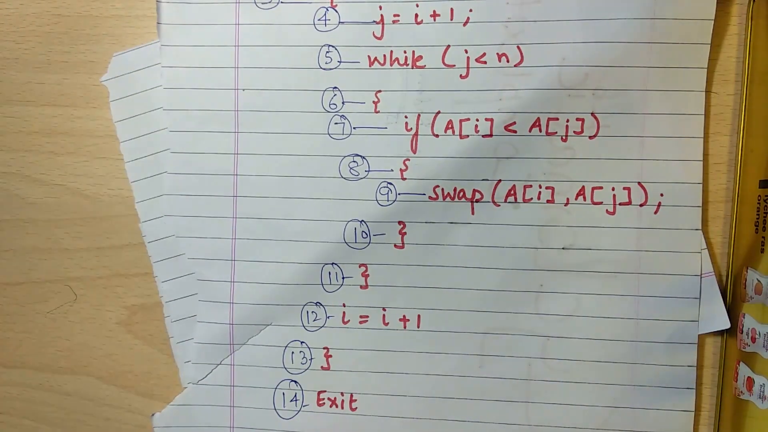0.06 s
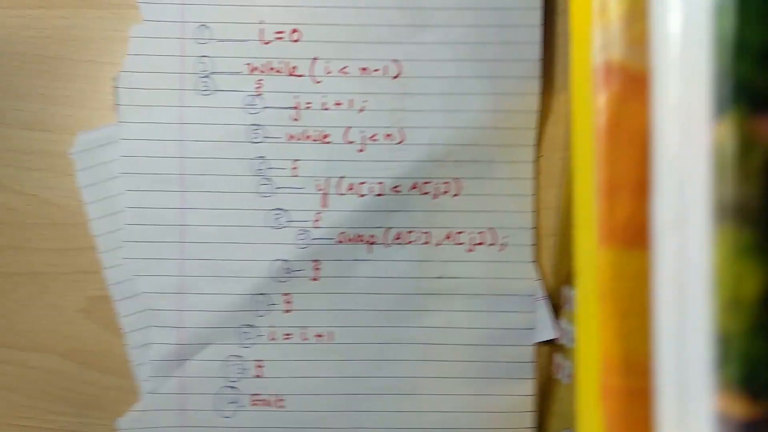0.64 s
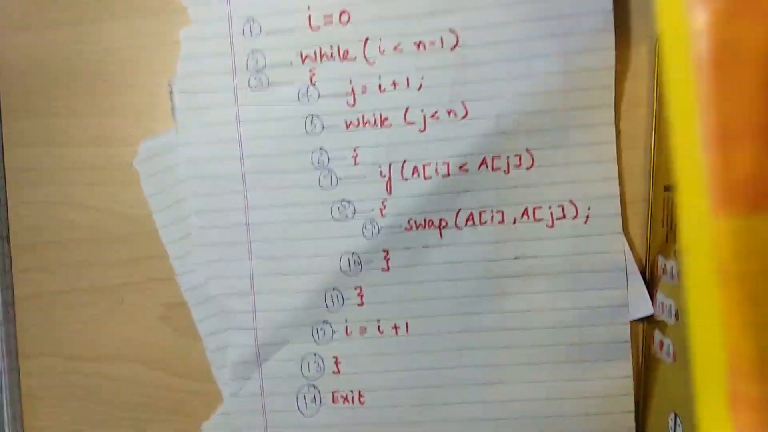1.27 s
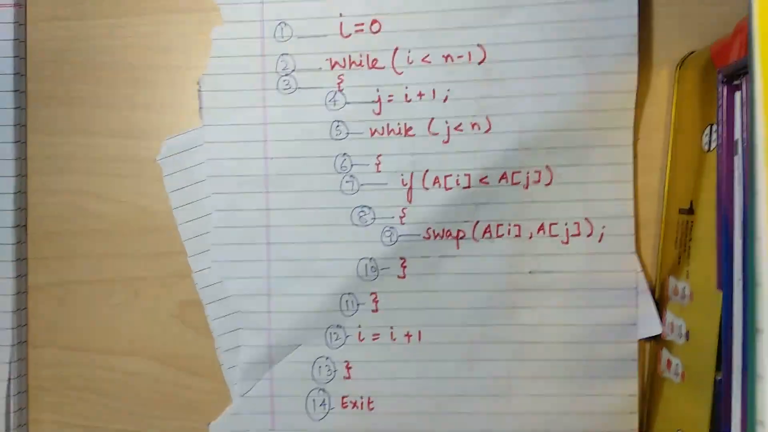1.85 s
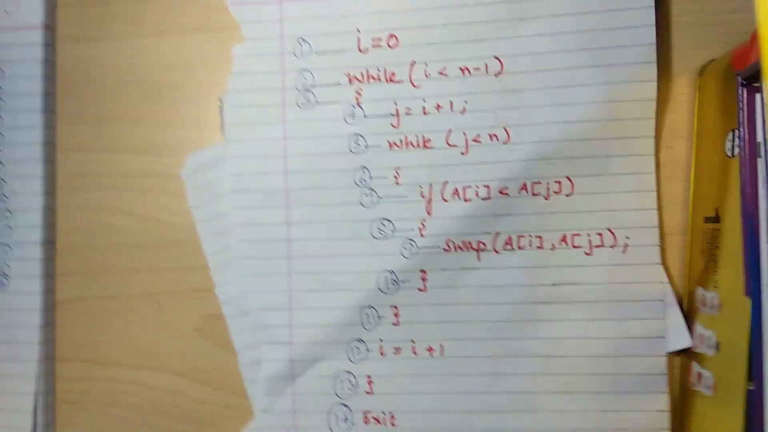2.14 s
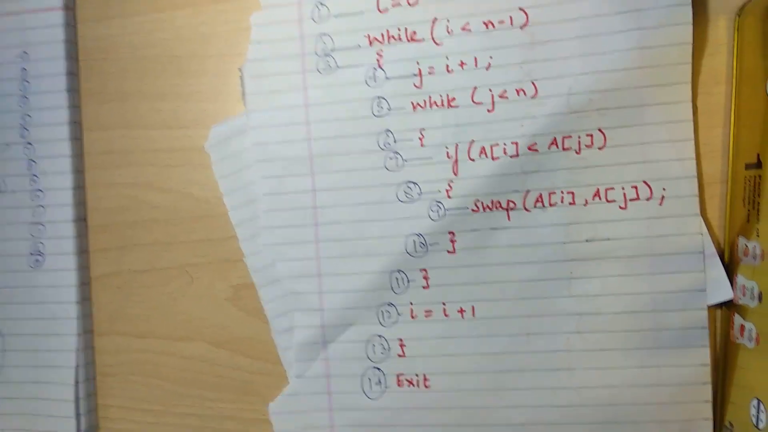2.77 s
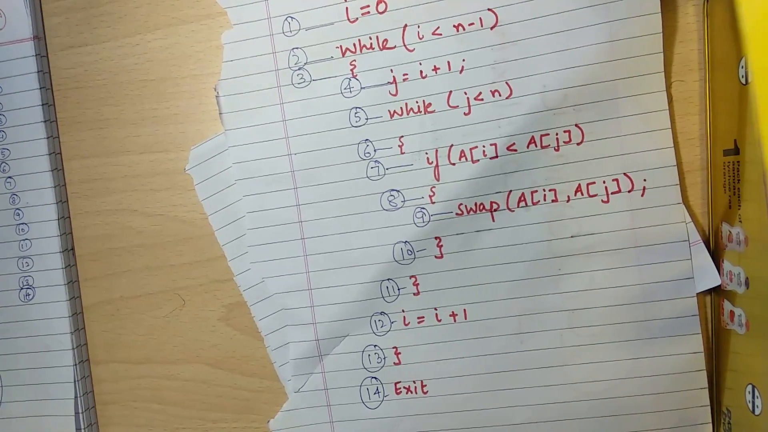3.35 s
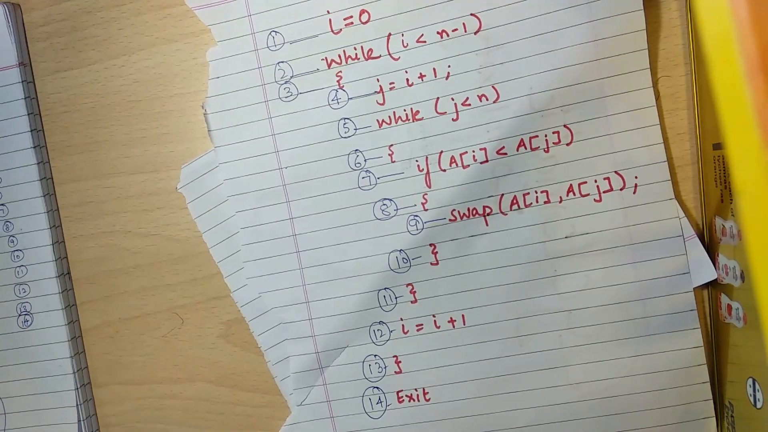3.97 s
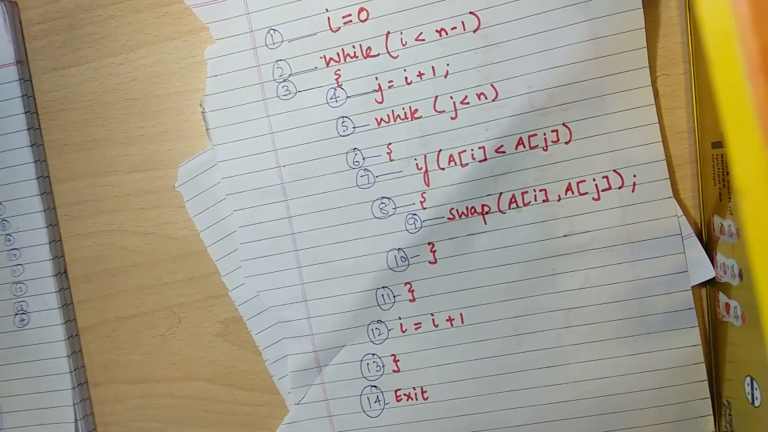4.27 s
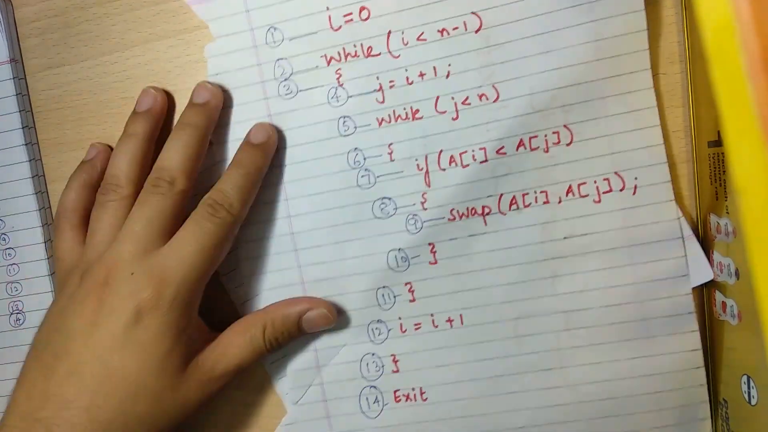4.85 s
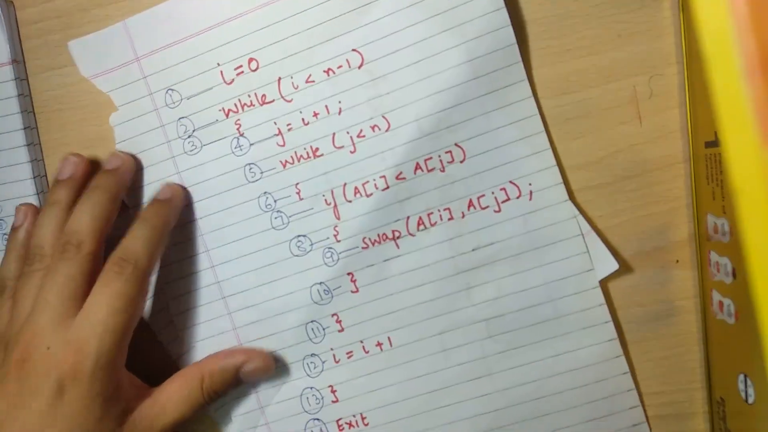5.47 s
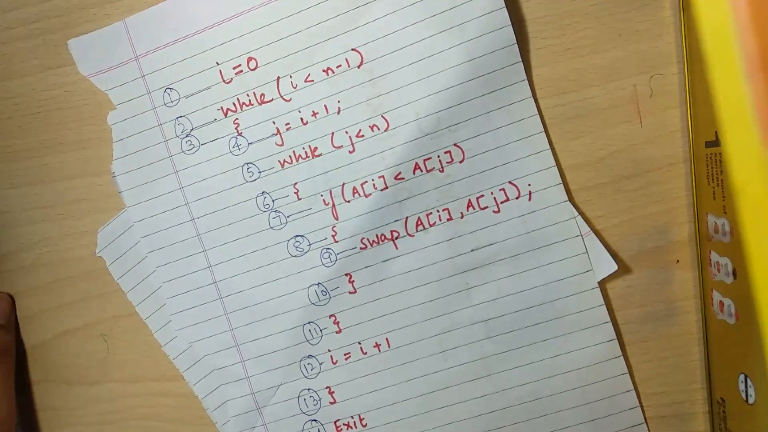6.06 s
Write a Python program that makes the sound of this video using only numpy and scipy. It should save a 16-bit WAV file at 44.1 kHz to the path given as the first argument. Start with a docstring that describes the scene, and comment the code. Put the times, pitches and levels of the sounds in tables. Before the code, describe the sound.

In a quiet room with a faint hum, paper is pushed about on a desk in uneven, crackly swishes. Close handling noise takes over on the right side: dull bumps, rubbing and a stuttering rumble of fingers on the microphone. The sheets then slide again with a few ticks, hissing most strongly shortly before one final rustle.

```python
"""Sheets of lined paper slide about a wooden desk under a hand-held phone.
Room hum and microphone hiss run from the start; the level drops out now and then. From 0.3 s the stack
drags, desk and case knock, and sheets hiss and rasp amid snaps and clicks. From 1.4 s fingers shift on
the case at the right microphone port: it rumbles, scrapes and thumps, then judders (2.6-3.6 s) as a
faint whine swells. From 4.2 s the sheets slide again, hissing most near 5.1 s."""
import sys
import numpy as np
from scipy import signal
from scipy.fft import rfft, irfft, next_fast_len
from scipy.io import wavfile
from scipy.ndimage import uniform_filter1d, map_coordinates

SR = 44100
rng = np.random.default_rng(int(sys.argv[2]) if len(sys.argv) > 2 else 0)


def put_to_file(sound):
    """Save the sound as 16-bit audio at rate SR, in the file named by the first command-line argument."""
    columns = np.atleast_2d(sound).T  # one column per channel
    safe = np.clip(columns, -1, 1)
    whole_steps = np.round(safe * 32767)
    wavfile.write(sys.argv[1], SR, whole_steps.astype(np.int16))


N = 274035


def amp(db):
    """Decibels to gain."""
    return 10 ** (np.asarray(db) / 20)


def unit(x):
    """Scale to rms 1."""
    return x / np.sqrt(np.mean(x ** 2) + 1e-20)


def wobble(rate_hz):
    """Smooth random curve, rate_hz knots a second."""
    knots = rng.standard_normal(int(N * rate_hz / SR) + 4)
    return map_coordinates(knots, [np.arange(N) * rate_hz / SR])


def filtered(x, response):
    """Apply a frequency response."""
    size = x.shape[-1]
    padded = next_fast_len(size + 8192)
    return irfft(rfft(x, padded) * response(np.fft.rfftfreq(padded, 1 / SR)), padded)[..., :size]


def coloured(x, spectrum):
    """Shape x by (Hz, dB) points; rms 1."""
    points_hz, db = np.transpose(spectrum)
    return unit(filtered(x, lambda hz: amp(np.interp(np.log(hz + 1), np.log(points_hz), db))))


def panned(pan_db):
    """Stereo gains of mean power 1; pan is left minus right."""
    gains = np.array([amp(pan_db / 2), amp(-pan_db / 2)]).reshape(2, -1)
    return gains / np.sqrt(np.mean(gains ** 2, axis=0))


def add(track, start_s, sound):
    """Mix a stereo sound into the track."""
    part = track[:, round(start_s * SR):][:, :sound.shape[1]]
    part += sound[:, :part.shape[1]]


def swells(rows, drop_db=26, rounding=0.31):
    """One round-topped envelope per row, drop_db down at the ends of its rise and fall."""
    peak_s, rise_s, fall_s = np.transpose(rows)[:3, :, None]
    t = np.arange(N) / SR - peak_s
    away = np.minimum(np.abs(t / np.where(t < 0, rise_s, fall_s)), 10)
    return amp(-drop_db * (np.hypot(away, rounding) - rounding) / (np.hypot(1, rounding) - rounding))


def power_sum(envelopes, gains):
    """Overlapping movements add in power."""
    return np.sqrt(gains ** 2 @ envelopes ** 2)


def friction(rate_hz, spread_db, smooth):
    """Tiny uneven slips over the smooth noise of countless finer ones."""
    slips = (rng.random(N) < rate_hz / SR) * rng.standard_normal(N)
    slips *= amp(spread_db * rng.standard_normal(N))
    return unit(slips) + smooth * rng.standard_normal(N)


def desk_bounce(x, echo=0.16):
    """Add the reflection off the desk; its lag drifts as the sheet moves."""
    n = np.arange(N)
    lag_s = 0.0004 * np.exp(0.12 * wobble(4))
    return unit(x + echo * np.interp(n - SR * lag_s, n, x))


# Room noise: (frequency [Hz], level [dB])
ROOM_SPECTRUM = [(25, 3.5), (55, -6), (85, 8.5), (140, 2.5), (220, -2.5), (310, 3), (450, -7.5),
                 (950, -9.5), (1170, -5.5), (1700, -12), (3400, -18), (8000, -29.5), (12000, -30),
                 (16000, -43)]


def room(level_db=-56.5, crossover_hz=300):
    """Steady hum and hiss, alike at both ports in the bass."""
    shared = coloured(rng.standard_normal(N), ROOM_SPECTRUM)
    apart = coloured(rng.standard_normal((2, N)), ROOM_SPECTRUM)
    bass = filtered(shared, lambda hz: crossover_hz / np.hypot(hz, crossover_hz))
    treble = filtered(apart, lambda hz: hz / np.hypot(hz, crossover_hz))
    return amp(level_db) * panned(pan_db=1) * (bass + treble)


# Microphone hiss: (frequency [Hz], level [dB])
MIC_SPECTRUM = [(1500, -20), (4000, -1), (8000, 2.5), (10300, 4), (11100, 9.5), (11900, 5), (13500, 1.5),
                (14500, -0.5), (15500, -0.5)]
# Whine envelope: (peak time [s], rise [s], fall [s])
WHINE_ENVELOPE = [(3.5, 2, 1.8)]


def self_noise(hiss_db=-63.5, whine_db=-69, whine_hz=14020):
    """Steady hiss of both microphones; a wavering whine swells and fades on the right."""
    wavering_hz = whine_hz + 90 * wobble(250)
    whine = swells(WHINE_ENVELOPE)[0] * unit(np.sin(2 * np.pi * np.cumsum(wavering_hz) / SR))
    hiss = panned(pan_db=-1) * coloured(rng.standard_normal((2, N)), MIC_SPECTRUM)
    return amp(hiss_db) * hiss + amp(whine_db) * np.outer([0, 1], whine)


# Drags of the stack: (peak time [s], rise [s], fall [s], level [dB])
STACK_DRAGS = [(.41, 0.15, 0.27, -52.5), (.73, 0.45, 0.69, -46), (1.702, 1, 3.6, -59),
               (5.98, 0.53, 0.52, -58.5)]
# Paper on wood: (frequency [Hz], level [dB])
DESK_SPECTRUM = [(60, -2.5), (150, 6.5), (400, 5.5), (900, 6.5), (1300, 0.5), (1650, -1.5), (2200, -4.5),
                 (4000, -13), (9000, -48)]


def stack_drag():
    """The whole stack rubs on the wood."""
    level_db = np.transpose(STACK_DRAGS)[3]
    drag = [desk_bounce(coloured(friction(1500, 4, smooth=0.81), DESK_SPECTRUM)) for port in range(2)]
    return power_sum(swells(STACK_DRAGS), amp(level_db)) * np.array(drag)


# Blows on case and desk: (time [s], relative level [dB], pan [dB], nominal pitch [Hz], cutoff [Hz])
BLOWS = [(0.35, -24, 3, 393, 890), (0.6418, -23.5, 26, 259, 1560), (0.7054, -12.5, -20, 140, 1100),
         (0.752, -25, -11, 142, 403), (1.005, -28, -19, 101, 250), (1.379, -11.5, -19, 137, 493),
         (1.385, -8.5, -32, 372, 1950), (2.3609, -3.5, -35, 111, 525), (2.4026, -16.5, -32, 207, 1361),
         (2.4193, -12, -35, 139, 352), (2.518, -24, -28, 127, 250), (2.5503, -9.5, -36, 160.6, 970),
         (2.799, -24, -26, 260, 1700), (2.8291, -4.5, -20, 114, 650), (2.8545, -6.5, -23.5, 223, 520),
         (2.873, -11.5, -29, 250, 417), (2.8865, -26, -28, 278, 590), (2.9004, -15.5, -35, 208, 308),
         (2.937, -23.5, -37, 192, 1200), (3.6206, -12.5, -32, 230, 1490), (4.204, -29, -20, 109, 1100),
         (4.2451, -21.5, -8, 109, 1530), (4.2619, -22.5, -27, 119, 915), (4.501, -38, 1.5, 100, 155),
         (4.828, -32.5, -8, 79, 510)]


def knocks(decay_cycles=6.96, trim_db=-6.5):
    """A blunt push and a damped swing that sinks in pitch as the contact relaxes."""
    track, t = np.zeros((2, N)), np.arange(SR // 4) / SR
    for time_s, level_db, pan_db, pitch_hz, cutoff_hz in BLOWS:
        t60_s = decay_cycles / pitch_hz
        sinking_hz = pitch_hz * (0.66 + 1.02 * np.exp(-t / 0.005))
        envelope = amp(-60 * t / t60_s) * (1 - np.exp(-t / 0.00024))
        swing = envelope * np.sin(2 * np.pi * np.cumsum(sinking_hz) / SR)
        contact = 0.12 * rng.standard_normal(len(t)) * amp(-60 * t / 0.022)  # grit
        contact[0] = -1  # impact
        push = signal.sosfilt(signal.butter(3, cutoff_hz, fs=SR, output="sos"), contact)
        blow = swing / np.abs(swing).max() + 0.62 * push / np.abs(push).max()
        add(track, time_s, amp(level_db + trim_db) * panned(pan_db) * blow / np.abs(blow).max())
    return track


# Pushes of a sheet: (peak time [s], rise [s], fall [s], hiss [dB], pan [dB], left rasp [dB])
SHEET_PUSHES = [(.59, .03, 0.045, -47.5, -2, -56), (0.721, 0.16, 0.1, -42.5, 3.5, -42.5),
                (.81, 0.17, 0.093, -41.5, 3.5, -42), (.97, 0.21, 0.4, -56, 6, -58),
                (1.112, 0.11, 0.19, -45.5, -2, -49), (1.38, 0.17, 0.081, -52, -0.5, -46),
                (1.495, 0.25, 0.2, -42.5, 15, -54.5), (1.61, 0.14, 0.15, -47, -0.5, -52.5),
                (1.713, 0.085, 0.14, -45.5, 8.5, -45), (1.866, .035, 0.074, -52, 10, -44.5),
                (1.915, 0.19, 0.1, -45, 2, -49), (2.114, 0.17, 0.14, -40.5, 11, -46),
                (2.22, .2, 0.22, -46.5, 14, -56.5), (2.76, 0.94, 0.53, -63.5, -2.5, -62.5),
                (3.64, 0.019, 0.075, -59, -6.5, -54.5), (4.17, 0.017, 0.034, -48, -26, -65.5),
                (4.277, 0.1, 0.047, -57, 8, -47), (4.332, 0.052, 0.056, -50, 7, -51),
                (4.829, 0.042, 0.094, -43.5, -9, -45.5), (5.09, 0.35, 0.2, -37.5, -8.5, -55.5),
                (5.45, 0.18, 0.26, -55, -6, -60), (5.717, 0.05, 0.27, -48.5, -9.5, -52.5),
                (5.951, 0.16, 0.26, -42, -7, -43)]
# Hiss of a sheet lying left or right, one spectrum per port (L, R): (frequency [Hz], level [dB])
LEFT_SHEET_SPECTRA = [
    [(2500, -19), (4000, -7), (5500, -4), (7500, 2), (9500, 2), (12000, 0), (15500, -1.5)],
    [(2500, -36.5), (5500, -19.5), (8000, -8), (9500, 0), (11500, 3.5), (13000, -3), (15500, -8.5)],
]
RIGHT_SHEET_SPECTRA = [
    [(2500, -24.5), (4200, -8), (6500, -1.5), (8000, -0.5), (10500, 1), (13000, -7.5), (15500, -11.5)],
    [(2500, -32.5), (5200, -13), (7400, -5.5), (8700, -5), (10700, 1.5), (13000, -1.5), (15500, -6.5)],
]
# Edge rasp: (frequency [Hz], level [dB])
RASP_SPECTRUM = [(900, 3), (2000, 5.5), (3200, 5.5), (4400, 8), (6000, 2), (8000, 3), (14000, -14)]


def sliding_sheets():
    """Fibres hiss as sheet slides on sheet, coloured by where it lies; edges rasp."""
    hiss_db, pan_db, left_rasp_db = np.transpose(SHEET_PUSHES)[3:]
    pushes, pan = swells(SHEET_PUSHES), panned(pan_db)
    hiss = 0
    for spectra, share in zip((LEFT_SHEET_SPECTRA, RIGHT_SHEET_SPECTRA), pan):
        fibres = [desk_bounce(coloured(rng.standard_normal(N), spectrum)) for spectrum in spectra]
        hiss += power_sum(pushes, share * amp(hiss_db) * pan) * np.array(fibres)
    rasp = [desk_bounce(coloured(friction(2500, 3, smooth=1.75), RASP_SPECTRUM)) for port in range(2)]
    right_rasp_db = left_rasp_db - 7.5 - 0.93 * pan_db  # weaker unless the sheet is near that port
    return hiss + power_sum(pushes, amp([left_rasp_db, right_rasp_db])) * np.array(rasp)


# Paper snaps, hard ticks and the clicks of knocks:
# (time [s], peak [dB], pan [dB], centre [Hz], width [Hz], t60 [s])
SNAPS_AND_CLICKS = [(.5700, -18, -20, 3700, 14000, 0.009), (0.644, -16.5, 6, 9050, 11000, 0.015),
                    (0.6435, -9, 24, 2150, 9070, 0.0034), (.7055, -24.5, 0, 4300, 900, 0.0051),
                    (0.706, -17, 2.5, 9500, 9000, .012), (1.3845, -27.5, -29, 2800, 2800, 0.014),
                    (2.8297, -10, 13.5, 6000, 11200, 0.016), (2.8297, -11.5, -6.5, 1460, 2200, 0.0046),
                    (3.2533, -30, 11, 13700, 9040, 0.014), (3.387, -33, -12, 2000, 8150, 0.021),
                    (3.442, -34.5, 11, 2830, 600, 0.003), (3.619, -25, -20, 1100, 2900, 0.028),
                    (3.7985, -39, 10, 2530, 650, 0.006), (4.1838, -13.5, -21, 2620, 6500, 0.0019),
                    (4.1836, -19.5, -27, 585, 1010, 0.0059), (4.243, -22, 23, 8100, 11900, 0.022),
                    (4.2618, -26.5, 11, 3680, 6040, 0.0024), (4.827, -23.5, -11, 6100, 13000, 0.026)]


def snaps_and_clicks(crackle_s=0.033):
    """A short crack rings in one resonance; longer ones hold more crackle."""
    track, t = np.zeros((2, N)), np.arange(SR // 20) / SR
    for time_s, peak_db, pan_db, centre_hz, width_hz, t60_s in SNAPS_AND_CLICKS:
        def resonance(hz):
            damping = 1j * hz * width_hz
            return (damping / (centre_hz ** 2 - hz ** 2 + damping)) ** 2

        burst = t60_s / crackle_s * rng.standard_normal((2, len(t))) * amp(-60 * t / t60_s)
        burst[:, 0] = -3  # impulse
        crack = filtered(burst, resonance)
        crack /= np.abs(crack).max(axis=1, keepdims=True)
        add(track, time_s, amp(peak_db) * panned(pan_db) * crack)
    return track


# Finger shifts: (peak time [s], rise [s], fall [s], rumble [dB], scrape [dB])
FINGER_RUBS = [(1.385, 0.053, 0.054, -35.5, -36.5), (1.531, 0.1, .08, -49.5, -41),
               (1.601, 0.11, 0.03, -48.5, -40.5), (1.728, 0.12, 0.16, -56, -45.5),
               (2.088, 0.067, 0.12, -50.5, -34), (2.122, 0.19, 0.05, -44.5, -34.5),
               (2.672, 0.049, 0.071, -30, -41.5), (2.76, 0.14, 0.082, -38, -44),
               (2.91, 0.15, 0.14, -31, -64), (3.038, 0.13, 0.28, -37.5, -44), (3.305, 0.21, 0.3, -36, -53),
               (3.57, 0.071, 0.056, -39.5, -71), (3.663, 0.16, 0.084, -38, -42.5),
               (4.188, 0.042, 0.025, -40, -38), (4.27, 0.083, 0.14, -42, -53),
               (5.75, 0.059, 0.07, -46, -67)]
# Case rumble, light scrape, pressed scrape: (frequency [Hz], level [dB])
RUMBLE_SPECTRUM = [(45, -33), (85, 5), (140, -0.5), (230, 3), (310, -2.5), (400, -40), (900, -64.5)]
GLIDING_SPECTRUM = [(100, -13.5), (400, -3.5), (610, 6.5), (800, -8.5), (1250, -14), (1650, -2), (2000, -4),
                    (3200, -12.5), (4600, -9.5), (9000, -26)]
PRESSED_SPECTRUM = [(150, -41), (300, 3), (450, 7), (680, 2.5), (900, -4), (1300, -6.5), (2200, -27),
                    (9000, -44.5)]


def finger_rubs():
    """Skin sticks and slips on the case: pressed it rumbles, gliding it scrapes with a brighter ring."""
    pressing, gliding = power_sum(swells(FINGER_RUBS), amp(np.transpose(FINGER_RUBS)[3:]))
    rumble = coloured(friction(500, 3.6, smooth=0.9), RUMBLE_SPECTRUM)
    lightness = 1 / (1 + (pressing / gliding) ** 1.97)
    slips = friction(900, 2.5, smooth=1.42)
    bright = np.sqrt(lightness) * coloured(slips, GLIDING_SPECTRUM)
    dull = np.sqrt(1 - lightness) * coloured(slips, PRESSED_SPECTRUM)
    return pressing * rumble + gliding * (bright + dull)


# Judders of a pressed finger: (peak time [s], rise [s], fall [s], level [dB], pitch [Hz])
FINGER_JUDDERS = [(2.645, 0.0098, 0.023, -33, 165), (2.692, 0.059, 0.16, -32.5, 139),
                  (3.231, 0.028, 0.039, -30.5, 165.2), (3.29, 0.035, 0.035, -34, 226),
                  (3.342, 0.011, 0.057, -31.5, 124.8), (3.546, 0.024, 0.05, -30, 201.7)]


def finger_judders():
    """Stick-slip falls into a brief, unsteady rhythm: a low grunt."""
    grunts = np.zeros(N)
    for envelope, (*_, level_db, pitch_hz) in zip(swells(FINGER_JUDDERS), FINGER_JUDDERS):
        phase = 2 * np.pi * np.cumsum(pitch_hz * np.exp(0.08 * wobble(40))) / SR
        grunts += amp(level_db) * envelope * unit(np.sin(phase) + 0.14 * np.sin(2 * phase))
    return grunts


def scene():
    """Room, paper and hand, in stereo."""
    grip = amp(1.6 * wobble(45))  # the paper catches and frees
    paper = grip * (stack_drag() + sliding_sheets())
    fingers = amp([[-25], [0]]) * (finger_rubs() + finger_judders())  # at the right port
    return room() + self_noise() + paper + knocks() + snaps_and_clicks() + fingers


# Level dropouts: (start [s], end [s], side [-1 left, 0 both, 1 right])
LEVEL_DROPOUTS = [(0, 0.056, 0), (0.068, 0.118, -1), (0.172, 0.307, 0), (2.274, 2.33, 1),
                  (2.587, 2.666, -1), (2.999, 3.254, -1), (3.369, 3.428, -1), (3.521, 3.6, -1),
                  (3.75, 3.795, -1), (3.854, 4.024, -1), (3.968, 4.078, 1), (4.024, 4.173, -1),
                  (4.423, 4.488, 0), (4.543, 4.595, 0), (4.602, 4.637, 0), (4.664, 4.713, 0),
                  (4.752, 4.786, 0), (5.489, 5.582, -1), (5.578, 5.661, 0), (6.153, 6.4, 0)]


def record(dry, low_hz=64, top_hz=15950):
    """The microphone sheds deep bass; the level fades and jumps back at set times; top treble is cut."""
    thinned = signal.sosfilt(signal.butter(4, low_hz, "high", fs=SR, output="sos"), dry)
    t, fade_db = np.arange(N) / SR, np.zeros((2, N))
    for start_s, end_s, side in LEVEL_DROPOUTS:
        ports = np.array([[side <= 0], [side >= 0]])
        fade_db -= ports * (t < end_s) * (np.maximum(t - start_s, 0) / 0.0069) ** 2
    gain = uniform_filter1d(amp(fade_db), size=90, axis=1)
    return filtered(thinned * gain, lambda hz: hz < top_hz)


dry = scene()
out = record(dry)
put_to_file(out)
```